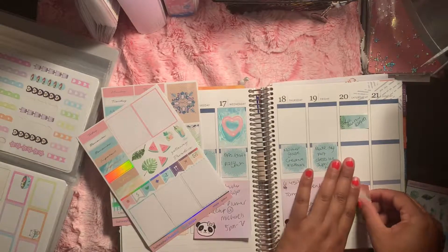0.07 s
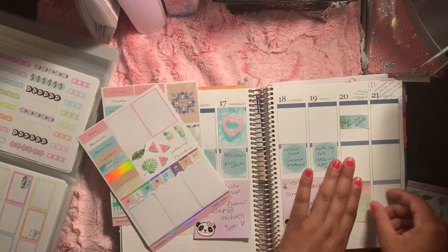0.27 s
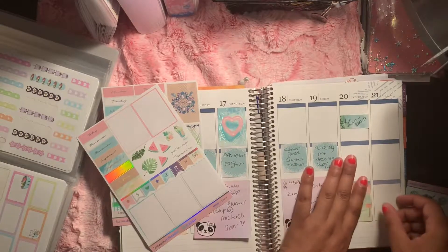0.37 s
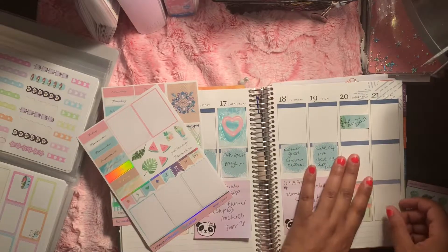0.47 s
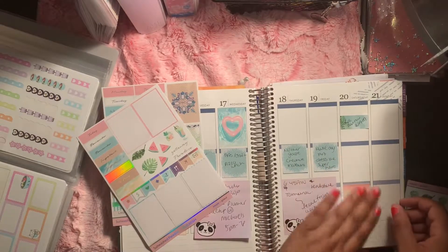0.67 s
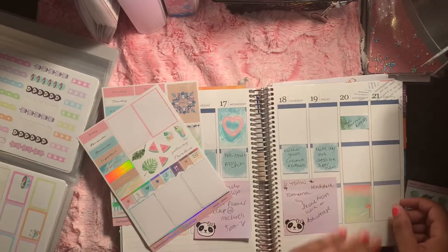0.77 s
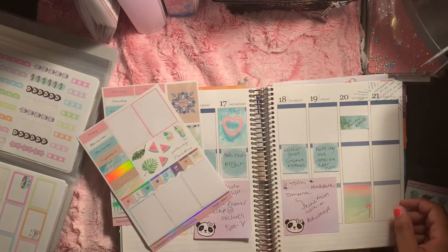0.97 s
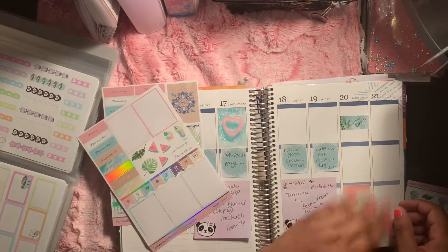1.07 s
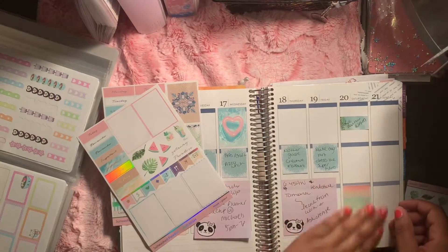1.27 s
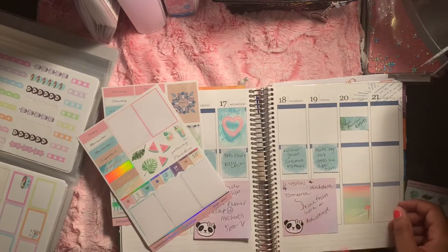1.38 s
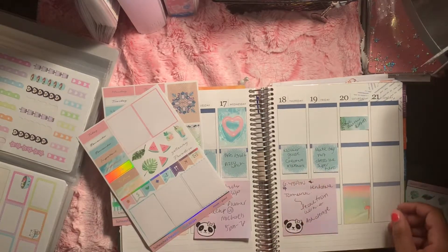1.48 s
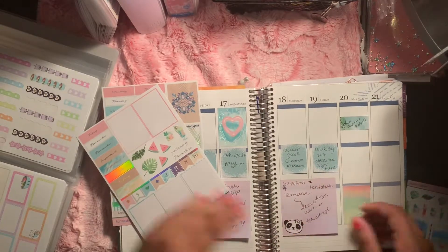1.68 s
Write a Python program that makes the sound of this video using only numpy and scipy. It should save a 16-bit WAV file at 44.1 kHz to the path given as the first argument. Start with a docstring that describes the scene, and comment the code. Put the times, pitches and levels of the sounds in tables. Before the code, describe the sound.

A paper sticker crackles as it is laid on a planner page, with two sharp snaps at about 0.2 seconds, the loudest moment. Fingers smooth it with a soft hiss from 0.4 to 0.85 seconds, ending in a dull pat. A second rub runs from 1.2 to 1.4 seconds, with a soft knock at each end. Everything is close, over a faint low room hum.

```python
"""Sticking a sticker in a planner

Mains hum, a low rumble and a faint hiss fill a quiet room. A hand lays a paper sticker in a planner:
the glue crackles and snaps twice, making the sheet ring. Fingers pat the page, which knocks on the
table below, and slide over it to smooth it, hissing as skin rubs the paper fibres.
A small stereo microphone hangs above."""
import sys
import numpy as np
from scipy import signal
from scipy.fft import rfft, irfft, next_fast_len
from scipy.io import wavfile

SR = 44100
rng = np.random.default_rng(int(sys.argv[2]) if len(sys.argv) > 2 else 0)


def to_wav(sig):
    """Store sig (one row per channel, or 1-D mono) as 16-bit WAV at the path in sys.argv[1].

    Samples outside -1..1 are clipped; the rate is SR.
    """
    pcm = np.clip(np.atleast_2d(sig), -1, 1) * 32767
    pcm = np.round(pcm).astype(np.int16)
    wavfile.write(sys.argv[1], SR, pcm.T)  # frames by channels


N = 77175

# how loud the hum is: t/s, low tone level/dB, octave level/dB
HUM_LEVELS = [(0.0, -49, -49.5), (0.112, -61.5, -64.5), (0.248, -64.5, -57), (0.408, -58, -59.5),
              (0.75, -59.5, -63.5), (0.892, -68.5, -68.5), (1.14, -52.5, -59), (1.282, -53, -70),
              (1.432, -78, -49.5), (1.622, -51.5, -60), (1.75, -63.5, -65)]
# tone of the house's rumble: f/Hz, level/dB
RUMBLE_COLOUR = [(25, -16), (40, -1), (80, -7.5), (140, -10.5), (200, -25.5), (350, -29.5), (600, -51)]
# tone of the faint hiss: f/Hz, level/dB
HISS_COLOUR = [(200, -30), (400, 0), (700, -10), (1000, -14), (1600, -12), (2800, -15), (5600, -19),
               (10000, -23), (13000, -32), (15500, -46)]
# how loudly the glue crackles as the sticker is handled: t/s, level/dB
CRACKLE_LEVELS = [(0, -63), (.025, -82), (.06, -75.5), (.068, -62), (.095, -62), (.099, -55.5), (.125, -56),
                  (.17, -63), (.188, -58.5), (.2, -51.5), (.225, -53), (.243, -44.5), (.262, -46.5),
                  (.29, -52.5), (.35, -71), (.4, -71.5)]
# tone of the crackle: f/Hz, level/dB
CRACKLE_COLOUR = [(300, -49.5), (1000, -26), (2000, -24.5), (3500, -11.5), (5200, -2.5), (7000, -7.5),
                  (9000, -2.5), (12000, -13.5), (15000, -15)]
# ticks as glue lets go or a fingertip lands: t/s, level/dB, treble tilt/(dB per octave)
SNAPS = [(0.03, -55, -3), (0.0731, -47.5, -3), (0.0974, -44, -0.5), (0.1212, -46.5, 1.2),
         (0.1992, -42.5, -2.5), (0.2078, -17, 0), (0.2097, -29.5, 2), (0.2174, -35, -5),
         (0.243, -34.5, -1.3), (0.2468, -22.5, 0.2), (0.2472, -10.5, 0.7), (0.2505, -23.5, -3),
         (0.2573, -32.5, -5), (0.5102, -57, -2.5), (0.8203, -34.5, -7.5), (.830, -38.5, 0.5),
         (1.183, -41.5, -9.5), (1.1876, -31, -9.5), (1.385, -30.5, -3)]
# the notes (modes) the sheet rings at: f/Hz, level/dB, time to fade by 60 dB/s
SHEET_MODES = [(450, -35, 0.027), (774, -38.5, 0.047), (1964, -25, 0.013), (3890, -13, 0.0019),
               (5770, -7.5, 0.0046), (7000, -4, 0.0033), (9080, 1.5, 0.0032), (11060, -9, 0.0034),
               (13800, -5, 0.004)]
# fingertips (high) and palm (low) landing on the page: t/s, level/dB, centre f/Hz
PATS = [(0.001, -50.5, 312), (0.208, -53, 280), (0.247, -48, 450), (0.312, -50.5, 700), (0.51, -60.5, 480),
        (0.714, -60, 242), (0.819, -43.5, 1907), (0.8211, -38.5, 633), (.828, -34, 169.3),
        (0.826, -29.5, 72), (.833, -35, 387), (.848, -45.5, 520), (1.185, -49, 1600), (1.1894, -31.5, 323),
        (1.200, -45, 1150), (1.200, -38.5, 503), (1.203, -32.5, 66), (1.386, -33.5, 1130),
        (1.392, -54, 2085), (1.389, -38.5, 450), (1.396, -28.5, 420), (1.395, -30, 76.2), (1.402, -31, 137),
        (1.410, -30.5, 307), (1.412, -48, 760)]
# the notes the planner and table top ring at: f/Hz, level/dB, time to fade by 60 dB/s
TABLE_MODES = [(72, 0.5, 0.14), (141.4, 0.5, 0.22), (180, -3.5, 0.1), (237, -8.5, 0.098),
               (266.5, -3.5, 0.055), (319.7, 0.5, .075), (383.8, -5, 0.053), (470, -3, 0.053),
               (668, -2.5, 0.016), (858, -7, 0.037), (1084, -2, 0.031), (1265, -5.5, 0.045),
               (1600, -3, 0.0086), (1955, -11.5, 0.048), (2400, -10, 0.0079), (3360, -16, 0.0067)]
# sliding fingers, one list a stroke: t/s, hiss level/dB, drag level/dB
STROKES = [
    [(0.34, -90, -94), (0.362, -82, -78), (0.428, -59.5, -73.5), (0.444, -63.5, -75), (0.478, -82, -80),
     (0.486, -83, -93), (0.5, -78, -84)],
    [(0.5, -83, -84), (0.508, -78, -75), (0.512, -63, -73), (0.55, -61.5, -74.5), (0.632, -52, -69.5),
     (0.704, -52, -68), (0.748, -52.5, -72.5), (0.812, -53.5, -70), (0.82, -53, -51), (0.832, -50, -53.5),
     (0.856, -70.5, -76), (0.93, -103, -101)],
    [(1.172, -99, -79), (1.1825, -80, -70), (1.1845, -50, -54), (1.2, -47.5, -52.5), (1.242, -49, -60),
     (1.278, -56, -74.5), (1.338, -54.5, -78), (1.376, -56.5, -66.5), (1.386, -51.5, -54),
     (1.396, -48.5, -80), (1.44, -92, -78.5), (1.49, -85, -84.5), (1.55, -80, -76), (1.62, -97, -90)],
]
# tone of a stroke's bright hiss: f/Hz, level/dB
SLIDE_COLOUR = [(1500, -32.5), (3000, -15), (4000, -5), (5500, 0), (8000, -1.5), (11000, 0), (15700, 3.5),
                (16600, -32)]
# tone of its duller drag: f/Hz, level/dB
DRAG_COLOUR = [(400, -9), (900, -8), (1300, -1.5), (2500, -3), (3500, -5), (6000, -23)]
# how alike left and right are for sound from all around: f/Hz, likeness (1 = the same)
LIKENESS = [(60, .9999), (150, 0.99), (350, 0.87), (600, 0.61), (1200, 0.87), (3000, 0.069), (4500, 0.99),
            (16000, 1)]
# how far the microphone's right side trails the left: f/Hz, lag/radians
RIGHT_LAG = [(0, 0), (1200, .1), (2100, .6), (3450, 1.5), (4750, 3.14), (6950, 6.28), (11150, 12.57),
             (15600, 18.85), (22050, 28)]


def amp(db):
    """Turn decibels into a gain."""
    return 10 ** (np.asarray(db) / 20)


def unit(x):
    """Scale x to an average size (rms) of 1."""
    return x / np.sqrt(np.mean(x ** 2) + 1e-20)


def in_time(rows, outside=None):
    """Join a table's points into curves over time."""
    times, *columns = np.transpose(rows)
    return [np.interp(np.arange(N) / SR, times, column, outside, outside) for column in columns]


def at_hz(points, hz):
    """Read a table at the frequency hz."""
    freqs, values = np.transpose(points)
    return np.interp(np.log(hz + 1), np.log(freqs), values)


def colour(x, spectrum):
    """Give x the tone in a table, at size 1."""
    return unit(irfft(rfft(x) * amp(at_hz(spectrum, np.fft.rfftfreq(N, 1 / SR))), N))


def spread(mid, side):
    """Mix two unrelated sounds into left and right, as alike as LIKENESS says."""
    alike = np.clip(at_hz(LIKENESS, np.fft.rfftfreq(N, 1 / SR)), 0, 1)
    shared = np.sqrt((1 + alike) / 2) * rfft(mid)
    opposite = np.sqrt((1 - alike) / 2) * rfft(side) * [[1], [-1]]
    return irfft(shared + opposite, N)


def stereo(x):
    """Widen x with a little unrelated sound that swells and fades with it."""
    return spread(x, x * rng.choice([-1, 1], N))


def drift(hz):
    """A slow random wobble of size 1."""
    r = np.exp(-2 * np.pi * hz / SR)
    return unit(signal.lfilter([1], [1, -2 * r, r * r], rng.standard_normal(N + SR))[SR:])


def grains(per_s, spread_db):
    """Random clicks, some louder than others."""
    size = amp(spread_db * np.minimum(rng.exponential(1, N), 5)) * rng.choice([-1, 1], N)
    return unit(size * (rng.random(N) < per_s / SR))


def ring(x, hz, t60):
    """Each click starts a note that fades by 60 dB in t60 seconds."""
    r, w = amp(-60 / (t60 * SR)), 2 * np.pi * hz / SR
    return signal.lfilter([0, np.sin(w)], [1, -2 * r * np.cos(w), r * r], x + 1e-18)


def fade(clicks, t60):
    """Each click becomes a falling loudness curve."""
    return signal.lfilter([1], [1, -amp(-60 / (t60 * SR))], clicks + 1e-18)


def mains_hum(hz=59.1, wander_db=3):
    """The mains hums with a low tone and its octave, each wavering."""
    phase, out = 2 * np.pi * hz * np.arange(N) / SR, 0
    for harmonic, db in enumerate(in_time(HUM_LEVELS), start=1):
        height = np.sqrt(2) * amp(db + wander_db * drift(6.0))
        out += height * np.sin(harmonic * phase + 0.3 * drift(3.9))
    return out


def air(rumble_db=-59, hiss_db=-83):
    """The low rumble of the house and a faint hiss."""
    rumble = amp(rumble_db) * colour(stereo(rng.standard_normal(N)), RUMBLE_COLOUR)
    return rumble + amp(hiss_db) * colour(stereo(rng.standard_normal(N)), HISS_COLOUR)


def sticker(hiss_gain=1.9, rattle_db=-13.5):
    """Glue hisses and pops in clumps. A pop rings one note of the sheet; a snap rings all and rattles."""
    crackle_db, = in_time(CRACKLE_LEVELS, outside=-140)
    pops = grains(per_s=2000 * amp(5.3 * drift(60)), spread_db=3.0)
    pop_mode = rng.integers(0, len(SHEET_MODES), N)
    times, snap_db, tilt_db = np.transpose(SNAPS)
    starts = (times * SR).astype(int)
    snaps, crackle, clicks = 0, 0, np.zeros(N)
    for k, (hz, mode_db, t60) in enumerate(SHEET_MODES):
        clicks[starts] = (-1) ** k * amp(snap_db + mode_db + tilt_db * np.log2(hz / 5000))
        snaps += ring(clicks, hz, t60)
        crackle += amp(at_hz(CRACKLE_COLOUR, hz)) * ring(pops * (pop_mode == k), hz, t60) / np.sqrt(t60)
    hiss = colour(stereo(rng.standard_normal(N)), CRACKLE_COLOUR)
    clicks[starts] = amp(snap_db + rattle_db)
    rattle = fade(clicks, t60=0.021) * hiss
    return amp(crackle_db) * unit(unit(crackle) + hiss_gain * hiss) + rattle + snaps


def pats(focus_db=8.5, push_cycles=0.64, puff_db=-15.5):
    """Each pat rings the table's notes near its own pitch and squeezes a puff from the pages."""
    knocks, puffs = np.zeros((2, N)), np.zeros(N)
    times, pat_db, pitch = np.transpose(PATS)
    scatter_db = rng.normal(0, 4, (len(PATS), len(TABLE_MODES)))
    lean = rng.choice([-0.59, 0.59], scatter_db.shape)  # each note leans left or right
    for k, (hz, mode_db, t60) in enumerate(TABLE_MODES):
        side = np.sqrt(1 - np.clip(at_hz(LIKENESS, hz), 0, 1)) * lean[:, k] * [[1], [-1]]
        off_pitch_db = focus_db * np.log2(hz / pitch) ** 2
        strength = (1 + side) * amp(pat_db + mode_db - off_pitch_db + scatter_db[:, k])
        travel_s = 0.004 * np.sqrt(100 / hz)  # bending waves bring the low notes later
        starts = ((times + travel_s) * SR).astype(int)
        clicks = np.zeros((2, N))
        np.add.at(clicks, (slice(None), starts), strength)
        push = np.hanning(int(push_cycles * SR / hz) + 3)  # softens each click
        knocks += (-1) ** k * ring(signal.lfilter(push / push.sum(), [1], clicks), hz, t60)
    puffs[(times * SR).astype(int)] = amp(pat_db + puff_db) * pitch / 1000  # higher pats puff more
    swell = signal.lfilter(np.ones(130) / 130, [1], fade(puffs, t60=0.05))
    band = signal.butter(1, [480, 2947], "band", fs=SR, output="sos")
    return knocks + swell * unit(signal.sosfilt(band, stereo(rng.standard_normal(N))))


def slides(flicker_db=1.45):
    """Skin rubs paper fibres: countless tiny clicks blur into a bright hiss over a duller drag."""
    levels = sum(amp(in_time(stroke, outside=-140)) for stroke in STROKES)
    levels *= amp(flicker_db * drift(32))
    return sum(level * colour(stereo(grains(per_s=12000, spread_db=2.5)), tone)
               for level, tone in zip(levels, [SLIDE_COLOUR, DRAG_COLOUR]))


def room(x, t60=0.3, wall_cut_hz=2400):
    """Sound bounces off the walls: ten repeating echoes a side, duller on every round."""
    size = next_fast_len(N + SR)
    w = 2 * np.pi * np.fft.rfftfreq(size, 1 / SR)
    dull = 1 / (1 + 1j * w / (2 * np.pi * wall_cut_hz))
    delay_s = rng.uniform(0.008, 0.03, (2, 10, 1))
    bounce = amp(-60 * delay_s / t60) * dull * np.exp(-1j * w * delay_s)
    echoes = (bounce / (1 - bounce)).sum(axis=1)
    return irfft(rfft(x, size) * echoes, size)[:, :N]


def scene(room_db=-19):
    """Hand and paper close by, the room all around."""
    near = sticker() + slides() + pats()
    return near + amp(room_db) * spread(*room(near)) + mains_hum() + air()


def record(dry, low_cut_hz=35, high_cut_hz=16900):
    """The microphone's right side trails the left; the deepest bass and highest treble are cut."""
    size = next_fast_len(N + 4096)
    lag = np.interp(np.fft.rfftfreq(size, 1 / SR), *np.transpose(RIGHT_LAG))
    right = irfft(rfft(dry[1], size) * np.exp(-1j * lag), size)[:N]
    low_cut = signal.butter(2, low_cut_hz, "high", fs=SR, output="sos")
    high_cut = signal.cheby2(12, 60, high_cut_hz, fs=SR, output="sos")
    return signal.sosfilt(high_cut, signal.sosfilt(low_cut, [dry[0], right]))


dry = scene()
out = record(dry)
to_wav(out)
```